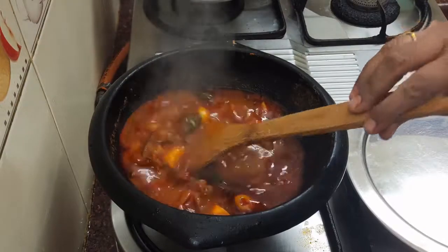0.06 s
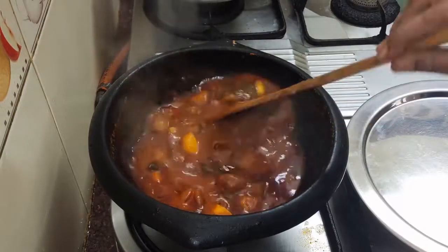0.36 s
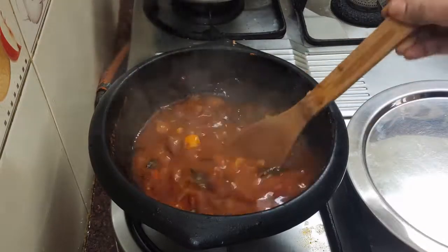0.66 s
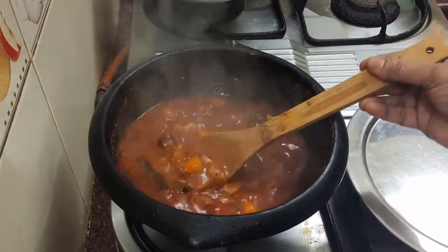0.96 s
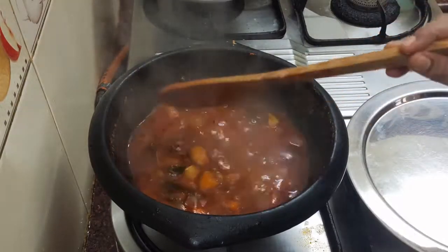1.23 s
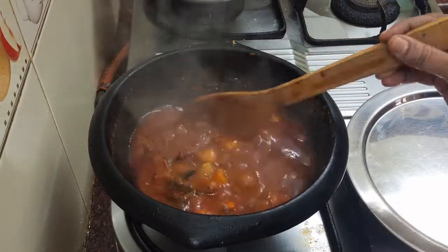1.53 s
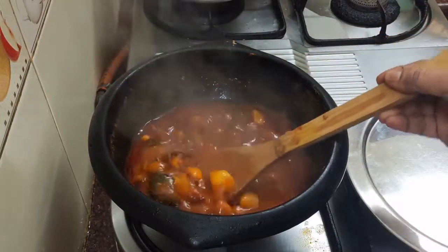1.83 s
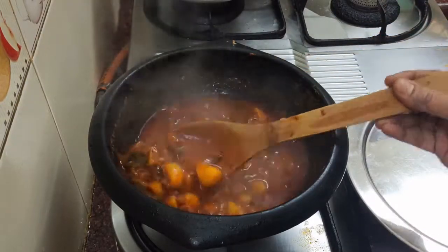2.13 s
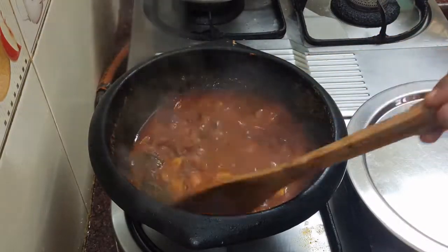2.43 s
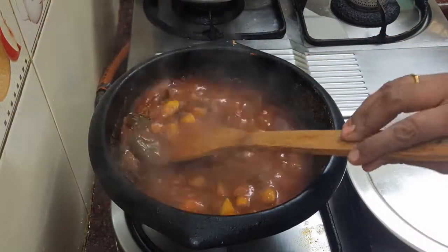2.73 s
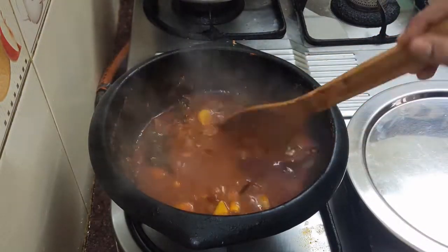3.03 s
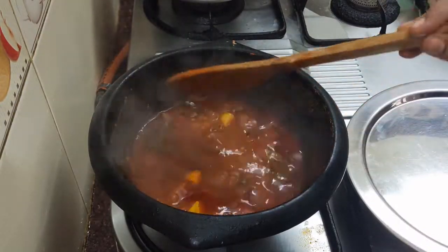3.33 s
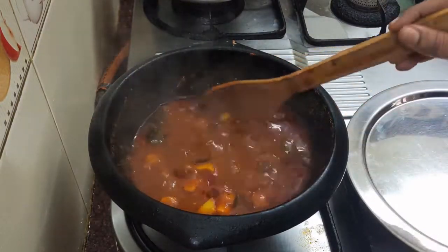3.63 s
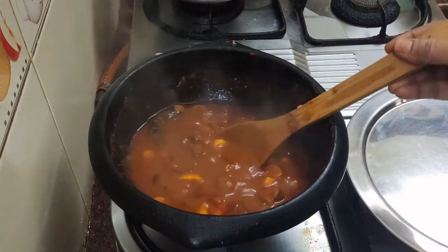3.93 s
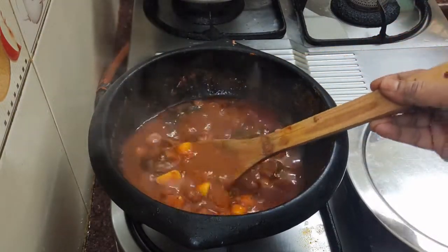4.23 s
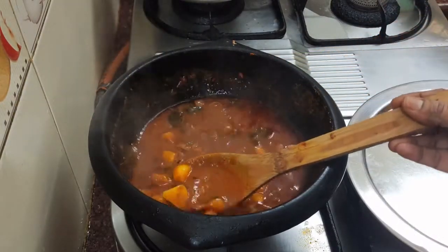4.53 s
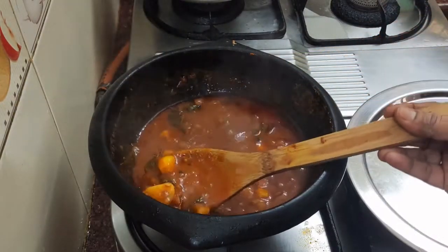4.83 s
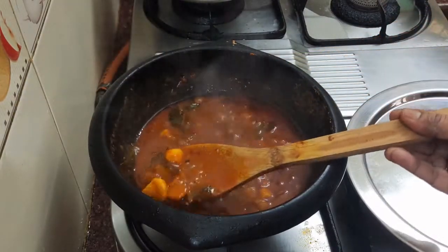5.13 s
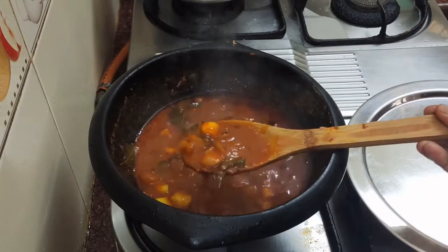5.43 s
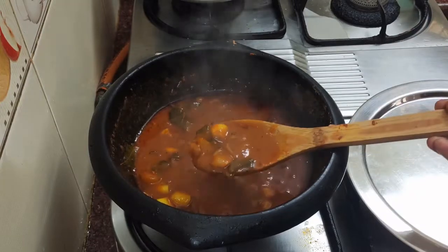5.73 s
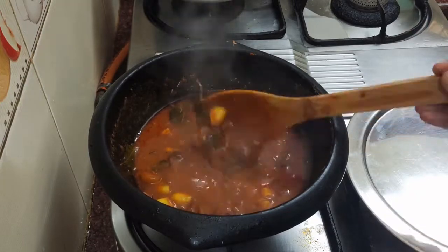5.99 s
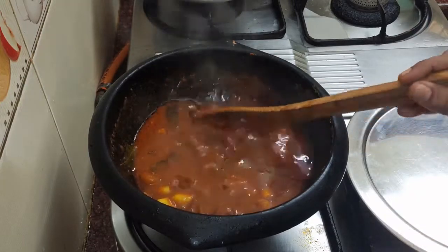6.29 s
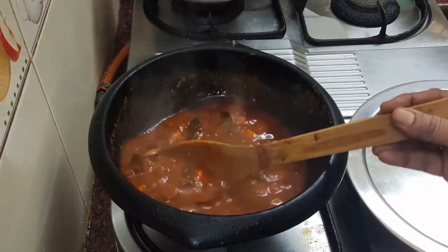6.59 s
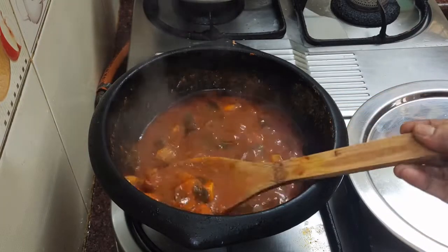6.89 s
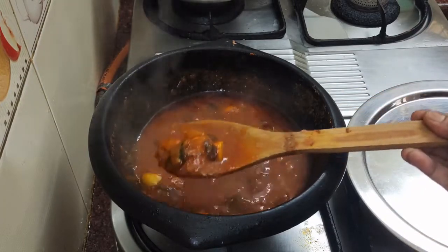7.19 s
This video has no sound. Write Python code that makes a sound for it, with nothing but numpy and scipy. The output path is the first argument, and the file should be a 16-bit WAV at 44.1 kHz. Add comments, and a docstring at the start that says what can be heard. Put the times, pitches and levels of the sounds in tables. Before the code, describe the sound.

A wooden spatula knocks and squelches through simmering gravy, stirring up surges of bright sizzle over small plops.

```python
"""Thick gravy sizzles and simmers in a heavy pan on a gas stove while a wooden spatula stirs it.
Tiny steam bursts at the hot wall make the sizzle, which surges as gravy washes up the wall.
Big bubbles plop, pinhead ones fizz, wet films snap, and the spatula knocks, scrapes and squelches.
Behind it, in a small tiled kitchen, are the rush of the flame, a faint mains hum and one deep bump."""
import sys
import numpy as np
from scipy import signal
from scipy.fft import rfft, irfft, next_fast_len
from scipy.io import wavfile
from scipy.ndimage import map_coordinates

SR = 44100
rng = np.random.default_rng(int(sys.argv[2]) if len(sys.argv) > 2 else 0)


def wav_out(sig):
    """Save sig, one row per channel (or a flat mono array), as 16-bit PCM at SR to the path in sys.argv[1]."""
    wavfile.write(sys.argv[1], SR, np.round(np.clip(np.atleast_2d(sig).T, -1, 1) * 32767).astype(np.int16))


N = 324152

# how alike left and right are in the sizzle and the fizz: (frequency [Hz], likeness [-1 to 1])
STEAM_LIKENESS = [(1500, .3), (2800, .3), (3800, -.05), (5000, -.2), (6300, -.7), (6750, -.45), (7050, .58),
                  (7700, .82), (8450, .55), (9200, .86), (13000, .8), (14000, .86)]


def amp(db):
    """Turn decibels into a gain."""
    return 10 ** (np.asarray(db) / 20)


def unit(x):
    """Scale a signal to an average (rms) level of 1."""
    return x / np.sqrt(np.mean(x ** 2) + 1e-20)


def along(points, hz):
    """Read between (frequency, value) points on a logarithmic frequency scale."""
    frequencies, values = np.transpose(points)
    return np.interp(np.log(hz + 1), np.log(frequencies + 1), values)


def wobble(rate):
    """A smooth curve through `rate` random values a second."""
    return map_coordinates(rng.standard_normal(int(N * rate / SR) + 4), [np.arange(N) * rate / SR])


def filtered(x, response):
    """Scale each frequency of x by the gain that `response` gives for it."""
    size = next_fast_len(x.shape[-1] + 8192)
    return irfft(rfft(x, size) * response(np.fft.rfftfreq(size, 1 / SR)), size)[..., :x.shape[-1]]


def band(hz, centre_hz, octaves):
    """A bell-shaped gain around a pitch."""
    return 1 / (1 + (np.log2((hz + 1) / centre_hz) / octaves) ** 2)


def stereo(pair, likeness):
    """Blend two unrelated signals into left and right of a given likeness."""
    angle = lambda hz: np.arccos(np.clip(along(likeness, hz), -1, 1)) / 2
    mid, side = filtered(pair, lambda hz: np.array([np.cos(angle(hz)), np.sin(angle(hz))]))
    return np.array([mid + side, mid - side])


def add(track, s, sound):
    """Mix a sound into a track, starting at s seconds."""
    start = max(round(s * SR), 0)
    part = track[start:start + len(sound)]
    part += sound[:len(part)]


def crackle(rate, spread_db):
    """Two unrelated streams of tiny, uneven clicks, about `rate` a second each."""
    fires = rng.random((2, N)) < rate / SR
    sizes = amp(spread_db * np.clip(rng.standard_normal((2, N)), -2.5, 2.5))
    return unit(fires * sizes * rng.choice([-1, 1], (2, N)))


def puff(t, hz, t60, octaves):
    """A burst of noise around a pitch; t60 is the seconds it takes to fade by 60 dB."""
    noise = rng.standard_normal(len(t)) * amp(-60 * t / t60)
    burst = filtered(noise, lambda f: band(f, hz, octaves) ** 2)
    return burst / abs(burst).max()


def bubble(hz, cycles, rise, samples=5000):
    """A bubble rings for some cycles; its pitch climbs as it opens."""
    t = np.arange(samples) / SR
    age = t * hz / cycles
    pitch = hz * (1 + rise * (np.minimum(age, 1) - .15))
    onset = 1 - np.exp(-t * hz / 0.95)
    return np.sin(2 * np.pi * np.cumsum(pitch) / SR) * amp(-60 * age) * onset


def kitchen(x, wet_db, left_db):
    """Add the short echo of the tiles at wet_db, and make the left side left_db louder than the right."""
    # how long the room rings: (frequency [Hz], time to fade by 60 dB [s])
    fade_times = [(200, 0.21), (900, 0.22), (3000, 0.28), (12000, 0.088)]
    hz, t, spectrum = signal.stft(rng.standard_normal((2, SR // 2)), SR, nperseg=256)
    tail = signal.istft(spectrum * amp(-60 * t / along(fade_times, hz)[:, None]), SR, nperseg=256)[1]
    tail *= np.minimum(np.arange(tail.shape[1]) / SR / 0.0077, 1)  # the echo builds up
    echo = signal.fftconvolve(x[None], tail / np.linalg.norm(tail[0]), axes=1)[:, :N]
    return (x + amp(wet_db) * echo) * amp([[left_db / 2], [-left_db / 2]])


def pan_echo(x, wet_db, t60):
    """Sound bounces between the walls of the pan, which colours its tone."""
    t = np.arange(SR // 12) / SR
    echoes = rng.standard_normal((2, len(t))) * amp(-60 * t / t60) * (t > .0007)
    return x + amp(wet_db) * signal.fftconvolve(x, echoes / np.linalg.norm(echoes[0]), axes=1)[:, :N]


def burner():
    """The gas flame rushes with a soft flutter."""
    # tone of the flame and the kitchen air: (frequency [Hz], relative level [dB])
    tone = [(20, 6.5), (38, -1), (80, -9.5), (112, 3.5), (135, -4), (215, 0), (300, -11), (360, 0.5),
            (435, -12), (780, -2.5), (1200, -16.5), (2000, -12.5), (5000, -37)]
    # how alike left and right are: (frequency [Hz], likeness [-1 to 1])
    likeness = [(30, 0.09), (70, 0.44), (120, 0.97), (250, 1), (700, 0.65), (1400, 0.16)]
    rush = filtered(stereo(rng.standard_normal((2, N)), likeness), lambda hz: amp(along(tone, hz)))
    flutter = amp(1.4 * wobble(14))
    return amp(-53.5) * flutter * unit(rush)


def mains_hum():
    """The electric supply hums faintly with two low, slightly wavering tones."""
    # the tones of the hum: (pitch [Hz], rms level [dB])
    tones = [(49, -66), (147, -67)]
    t = np.arange(N) / SR
    return sum(amp(db) * np.sqrt(2) * np.sin(2 * np.pi * hz * t + .5 * wobble(3.07)) for hz, db in tones)


def bump(s, hz, db):
    """One soft, deep bump, stronger on the right."""
    t = np.arange(N) / SR - s
    return -amp(db) * np.cos(2 * np.pi * hz * t) * np.exp(-(t / 0.013) ** 2) * amp([[-6], [3]])


def strokes(rows, grain_rate, octaves):
    """Sticking and slipping makes short, grainy swells, each around its own pitch."""
    track, t = np.zeros(N), np.arange(SR // 3) / SR
    grains = crackle(grain_rate, spread_db=3)[0]
    for middle, half, db, hz in rows:
        start = max(middle - t.mean(), 0)
        rub = filtered(grains[round(start * SR):][:len(t)], lambda f: band(f, hz, octaves) ** 2)
        swell = np.exp(-.5 * ((start + t[:len(rub)] - middle) / half) ** 2)
        add(track, start, amp(db) * unit(rub) * swell)
    return track


def stirring():
    """The spatula rasps on the bottom and pushes the thick gravy aside."""
    # wood drags over the pan: (middle [s], half length [s], level [dB], pitch [Hz])
    scrapes = [(.137, 0.011, -46.5, 2370), (.79, 0.018, -63, 1400), (.875, .02, -52, 1950),
               (1.64, 0.053, -53.5, 2200), (1.735, 0.028, -49.5, 2190), (1.775, 0.023, -54, 1470),
               (1.774, 0.0096, -44, 4420), (2.66, 0.069, -56, 1500), (2.98, 0.034, -58, 2380),
               (6.93, .015, -61, 2600), (2.3, 0.08, -67, 1920)]
    # the gravy heaves: (middle [s], half length [s], level [dB], pitch [Hz])
    squelches = [(.135, 0.0085, -43, 462), (1.565, 0.022, -49, 335), (2.487, 0.0056, -41, 368),
                 (2.59, 0.024, -49.5, 232), (3.64, 0.021, -49, 300), (4.5, 0.015, -52, 370),
                 (6.46, 0.041, -47.5, 380)]
    rasp = strokes(scrapes, grain_rate=990, octaves=1.0)
    squelch = strokes(squelches, grain_rate=550, octaves=0.99)
    return kitchen(amp(-1.0) * rasp + amp(-6.5) * squelch, wet_db=-6.5, left_db=-1.0)


def knocks():
    """Wood hits the gravy-filled pan: each spot brings out other tones, and the stove under it thuds."""
    # spatula hits, plus one small wet tick at 4.881 s: (time [s], level [dB], favoured pitch [Hz], thud
    # relative to the hit [dB])
    hits = [(.123, -34.5, 2400, -19), (0.779, -39.5, 1300, -2), (.864, -34.5, 1980, -6),
            (1.082, -39.5, 1140, -6), (2.569, -27.5, 1700, -6), (2.733, -36, 1080, -12),
            (3.612, -30, 1380, -9.5), (3.703, -36.5, 950, -14), (3.872, -46, 610, -3),
            (4.488, -39, 920, -3.5), (4.881, -41, 1200, -8), (5.287, -35.5, 1070, -4.5),
            (5.649, -40.5, 2200, -2), (6.793, -43, 1500, -14)]
    # the tones the full pan rings with: (pitch [Hz], relative level [dB], time to fade by 60 dB [s])
    pan_tones = [(550, 3, 0.072), (849, 1.5, .05), (1130, -7, .03), (1390, 1, 0.054), (1473, -2.5, 0.047),
                 (1740, -1, 0.046), (1977, -3, 0.092), (2326, -4, 0.064), (2810, -14, .05),
                 (2950, -20, .05), (3680, -10, .04)]
    track, t = np.zeros(N), np.arange(SR // 4) / SR
    hz, tone_db, t60 = np.transpose(pan_tones)[:, :, None]
    for s, db, spot_hz, thud_db in hits:
        gains = amp(tone_db + rng.normal(0, 1, hz.shape)) * band(hz, spot_hz, octaves=0.32)
        ring = np.sum(gains * amp(-60 * t / t60) * np.sin(2 * np.pi * hz * t), axis=0)
        ring /= abs(ring).max()
        crack = puff(t, spot_hz, t60=0.01, octaves=0.67)
        stove_ring = amp(-12.0) * np.sin(2 * np.pi * 215 * t) * amp(-60 * t / 0.24)
        thud = puff(t, 420, t60=0.061, octaves=2.1) + stove_ring
        add(track, s, amp(db) * (amp(0.5) * ring + amp(-4.5) * crack + amp(thud_db) * thud))
    return kitchen(track, wet_db=-7, left_db=2.5)


def small_bubbles(count, hz, spread):
    """Small bubbles open at random times and pitches, louder while the gravy is churned."""
    # how hard the spatula churns: (time [s], boost [dB])
    churn = [(0, 8), (1.0, 4), (1.9, 6), (2.45, -0.5), (3.1, 6), (3.8, -3.5), (4.3, 3), (4.9, -1), (6.0, 6),
             (6.7, -5), (7.35, -4)]
    track = np.zeros(N)
    times = rng.uniform(0, N / SR, count)
    for s, (size, pitch) in zip(times, np.clip(rng.standard_normal((count, 2)), -2, 2)):
        db = 3.0 * size + np.interp(s, *np.transpose(churn))
        add(track, s, amp(db) * bubble(hz * np.exp(spread * pitch), cycles=12.5, rise=0.53, samples=1500))
    return track


def snaps():
    """Films of gravy break with a tick and a short, high chirp; tiny wet ticks follow the stirring."""
    # thin wet films breaking: (time [s], level [dB], pitch [Hz])
    films = [(2.638, -37, 3650), (2.937, -33, 2700), (3.076, -35, 2750), (3.1158, -36, 3260),
             (3.8781, -36, 2660), (3.8945, -40, 1630), (6.3762, -34, 2900), (6.916, -30, 2590)]
    track, t = np.zeros(N), np.arange(SR // 30) / SR
    for s, db, hz in films:
        add(track, s, amp(db) * bubble(hz, cycles=28, rise=0.38))
        add(track, s, amp(db + 0.5) * puff(t, 1.06 * hz, t60=0.008, octaves=0.9))
    ticks = amp(-47.0) * small_bubbles(count=420, hz=1964, spread=0.42)
    return kitchen(track, wet_db=-6, left_db=-1) + kitchen(ticks, wet_db=-1.5, left_db=0.5)


def weaker_plops(count):
    """Weaker bubbles, loosely spread over the simmer, as rows of (time [s], level [dB], pitch [Hz])."""
    times = (np.arange(count) + rng.random(count)) * N / SR / count
    size, pitch = np.clip(rng.standard_normal((count, 2)), -2, 2).T
    return list(zip(times, -45.5 + 1.5 * size, 807 * np.exp(.32 * pitch)))


def plops():
    """Big bubbles open one by one over a steady blipping of small ones."""
    # the biggest bubbles: (time [s], level [dB], pitch [Hz])
    big_bubbles = [(.36, -43.5, 615), (.427, -40, 980), (.491, -44, 810), (.64, -41.5, 820),
                   (.745, -37.5, 760), (1.552, -41.5, 950), (2.089, -36.5, 666), (2.219, -38.5, 810),
                   (2.241, -39, 1010), (2.479, -39, 657), (3.287, -44, 856), (3.491, -41, 870),
                   (3.756, -37, 931), (4.058, -39, 930), (4.118, -45, 1050), (4.589, -44.5, 1040),
                   (4.662, -41, 710), (4.747, -43.5, 930), (5.078, -40.5, 820), (5.442, -42, 665),
                   (5.545, -42, 815), (5.667, -29.5, 853), (5.757, -34, 765), (6.957, -43.5, 672),
                   (7.242, -40, 810)]
    track, t = np.zeros(N), np.arange(SR // 10) / SR
    rows = list(big_bubbles) + weaker_plops(count=26)
    for (s, db, hz), (lag, detune) in zip(rows, rng.random((len(rows), 2))):
        add(track, s, amp(db + 2.0) * bubble(hz, cycles=28.5, rise=0.15))
        # the crater closes a moment later with a weaker ring at another pitch
        closing = bubble(hz * (0.806 + 0.57 * detune), cycles=16, rise=.2)
        add(track, s + 0.00622 + 0.0121 * lag, amp(db - 7.5) * closing)
        # even a weak bubble lets out a fair puff of steam
        add(track, s, amp(0.34 * db - 30.5) * puff(t, hz, t60=0.033, octaves=1.46))
    blips = amp(-50.0) * small_bubbles(count=460, hz=605, spread=0.437)
    return kitchen(track + blips, wet_db=-3.5, left_db=7.5)


def fizz():
    """Pinhead bubbles burst evenly all over the gravy, whatever the spatula does."""
    # tone of the fizzing surface: (frequency [Hz], relative level [dB])
    tone = [(900, -14), (1800, -9.5), (3400, -0.5), (4500, -0.5), (6100, 4.5), (7500, -3.5), (11000, -12),
            (15000, -11)]
    pops = stereo(pan_echo(crackle(5000, spread_db=4), wet_db=2.0, t60=0.1), STEAM_LIKENESS)
    hiss = unit(filtered(pops, lambda hz: amp(along(tone, hz))))
    return amp(-50.5 + 0.94 * wobble(5)) * hiss * amp([[-2], [2]])


def spits():
    """A few loud steam bursts spit out singly, a little to the left."""
    # single spits: (time [s], level [dB])
    bursts = [(0.0144, -20), (0.0204, -25), (0.0814, -31), (4.9397, -31), (5.023, -27.5), (5.5724, -29),
              (5.6316, -32)]
    track, t = np.zeros(N), np.arange(SR // 30) / SR
    for s, db in bursts:
        add(track, s, amp(db + 0.5) * puff(t, 8000, t60=0.015, octaves=0.63))
    return track * amp([[1.5], [-1.5]])


def sizzle_strength():
    """A restless simmer that slowly eases, plus a smooth swell for each wash of gravy up the wall."""
    # stirred gravy washes onto the hot wall: (middle [s], half length [s], relative level [dB])
    surges = [(0.024, 0.058, -33), (0.277, 0.044, -39), (.52, .022, -43.5), (.648, .028, -37),
              (.766, 0.029, -36), (0.916, 0.058, -39), (1.228, .036, -37), (1.316, .02, -43.5),
              (1.44, 0.045, -48), (2.14, 0.02, -38.5), (2.254, .016, -39.5), (2.325, 0.02, -38),
              (2.405, .02, -41.5), (2.684, 0.019, -44.5), (2.977, 0.019, -46), (3.242, .04, -39.5),
              (3.328, 0.021, -40), (3.473, .033, -38), (3.778, .032, -40.5), (4.045, .036, -41.5),
              (4.326, .05, -40.5), (4.575, .032, -38.5), (4.837, 0.042, -41), (4.951, 0.011, -43),
              (5.047, 0.013, -40.5), (5.116, .026, -42), (5.371, .036, -41), (5.564, .015, -40),
              (5.66, .027, -38), (5.955, .04, -40.5), (6.195, 0.039, -43.5), (6.478, .04, -44),
              (6.748, 0.019, -39.5), (7.021, .031, -41), (7.282, .04, -44)]
    t = np.arange(N) / SR
    simmer = amp(-39.5 - 0.24 * t)
    swells = sum(amp(db) * np.exp(-.5 * ((t - middle) / half) ** 2) for middle, half, db in surges)
    flicker = amp(1.41 * wobble(42))
    return (simmer + swells) * flicker + amp(-52)


def sizzle():
    """Countless steam bursts at the hot wall; a surge makes them louder and denser."""
    # tone of the sizzle on the left and on the right: (frequency [Hz], relative level [dB])
    left_tone = [(900, -29), (2000, -25.5), (4400, -21.5), (5400, -13), (6200, -8), (6850, -9.5),
                 (7600, -1.5), (8200, -1), (9100, -9.5), (10500, -14.5), (11900, -23), (13300, -26.5),
                 (14200, -21), (15800, -23)]
    right_tone = [(900, -34), (2000, -28), (3400, -18.5), (4600, -18), (6100, -5), (6900, -9), (7400, -6),
                  (8750, -15), (9150, -12), (10550, -13.5), (11900, -26.5), (13300, -19), (14200, -26),
                  (15800, -24)]
    # the tone turns mellow or bright as gravy wets other parts of the wall: (time [s], mellowness [dB])
    mellowness = [(0, 1), (1.0, 0), (1.6, .5), (2.1, -0.5), (3.2, -0.5), (4.3, -1), (4.7, 0), (6, 1),
                  (7.35, 1.2)]
    mellow_db = np.interp(np.arange(N) / SR, *np.transpose(mellowness))
    strength = sizzle_strength()
    density = (strength / strength.mean()) ** .3
    bursts = crackle(9000 * density, spread_db=3.5) + amp(-11.5) * crackle(600 * density, spread_db=1)
    bursts = stereo(pan_echo(bursts, wet_db=-6.5, t60=0.11), STEAM_LIKENESS)
    hiss = unit(filtered(bursts, lambda hz: amp([along(left_tone, hz), along(right_tone, hz)])))
    low = filtered(hiss, lambda hz: 1 / (1 + (hz / 7300) ** 10))
    bright = hiss - low
    # a surge lifts the bright part more than the low part
    hiss = low * amp(mellow_db) / density ** 0.45 + bright * amp(-.5 * mellow_db)
    balance = amp(np.outer([-1, 1], 0.48 * mellow_db))  # the bright stretch of wall lies to the left
    return amp(0.07) * balance * strength * hiss


def scene():
    """The gravy, the spatula and the background, mixed in stereo."""
    gravy = sizzle() + spits() + fizz() + plops() + snaps()
    spatula = knocks() + stirring()
    background = burner() + mains_hum() + bump(s=5.438, hz=36.5, db=-34.5)
    return gravy + spatula + background


def record(dry):
    """Cut off the very highest treble."""
    return filtered(dry, lambda hz: hz < 15780)


dry = scene()
out = record(dry)
wav_out(out)
```